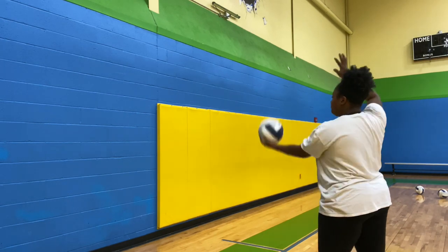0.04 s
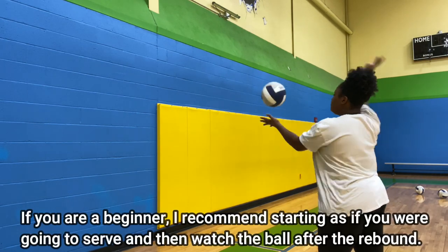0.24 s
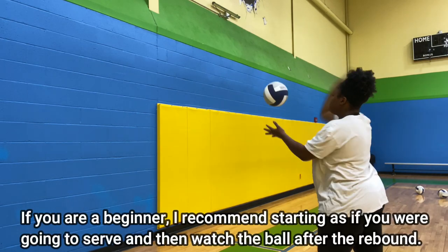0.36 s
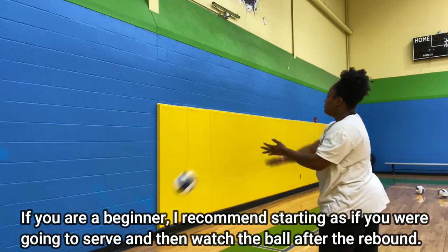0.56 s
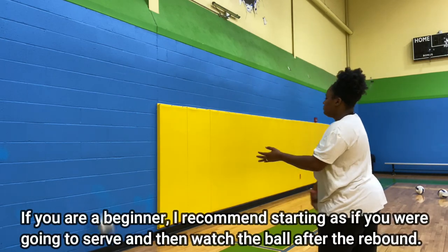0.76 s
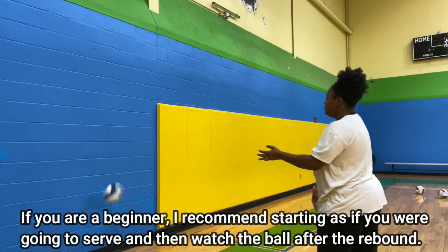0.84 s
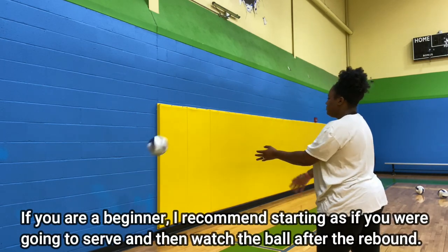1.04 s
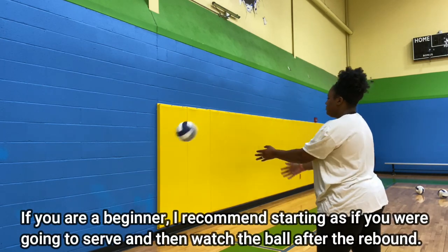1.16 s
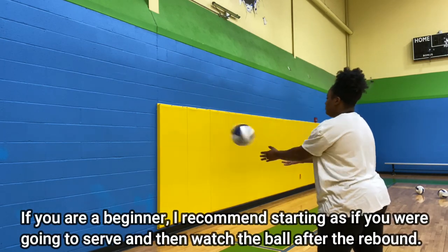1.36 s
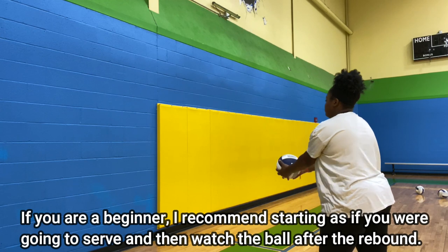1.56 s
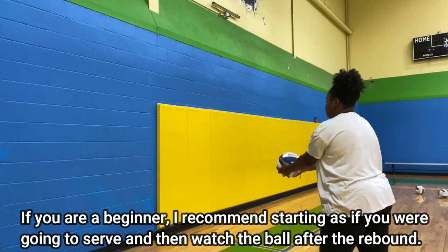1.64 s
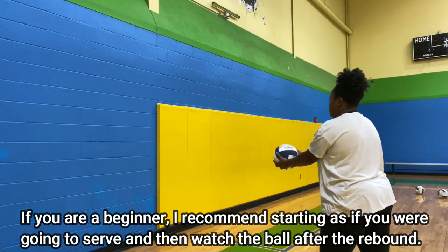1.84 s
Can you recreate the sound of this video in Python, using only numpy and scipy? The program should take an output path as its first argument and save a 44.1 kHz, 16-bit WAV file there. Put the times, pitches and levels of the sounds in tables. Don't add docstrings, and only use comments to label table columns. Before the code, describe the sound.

A volleyball is slapped by a hand, smacks a padded gym wall, then is softly caught

```python
import sys
import numpy as np
from scipy import signal
from scipy.fft import rfft, irfft
from scipy.io import wavfile
from scipy.ndimage import uniform_filter1d

SR = 44100
rng = np.random.default_rng(int(sys.argv[2]) if len(sys.argv) > 2 else 0)


def attenuation_scalar(level_db):
    decades = np.asarray(level_db, float) / 20
    return 10 ** decades


def persist_wave(psi):
    counts = np.round(np.clip(psi, -1, 1) * 32767).astype(np.int16)
    wavfile.write(sys.argv[1], SR, np.atleast_2d(counts).T)


N = 83790

# (frequency [Hz], level [dB per Hz])
SLAP_COLOUR = [(200, 3.5), (500, -5.5), (1230, -10.5), (1980, -14), (3200, -14.5), (5230, -27.5),
               (8000, -25), (16000, -33)]
WALL_COLOUR = [(200, 7.5), (700, 1.5), (1050, 2), (2170, 1), (3130, -7), (5330, -21.5), (8200, -17.5),
               (16000, -24)]
CATCH_COLOUR = [(200, -3.5), (450, -2.5), (1500, -3), (2400, -5), (3500, -10), (5500, -19), (8500, -18.5),
                (16000, -26.5)]
# (time [s], crack tail level [dB], thump tail level [dB])
TAILS = [
    (0.457, -21.5, -18),
    (0.724, -20.5, -15),
    (1.533, -38, -103),
]
TAIL_RISE_S = 0.011


def rms_one(x):
    return x / np.sqrt(np.mean(x ** 2) + 1e-20)


def at_hz(points, hz):
    points = np.array(points)
    return np.interp(np.log(hz), np.log(points[:, 0]), points[:, 1])


def since(s):
    return np.maximum(np.arange(N) / SR - s, 0)


def loudness(spectrum):
    hz = np.linspace(100, SR / 2, num=400)
    return np.sqrt(np.mean(attenuation_scalar(2 * at_hz(spectrum, hz))))


def peak(x, hz, db, sharp):
    g, w = attenuation_scalar(db / 2), 2 * np.pi * hz / SR
    a = np.sin(w) / (2 * max(sharp, .3))
    return signal.lfilter([1 + a * g, -2 * np.cos(w), 1 - a * g], [1 + a / g, -2 * np.cos(w), 1 - a / g], x)


def causal(db, size):
    ceps = irfft(np.log(attenuation_scalar(db)), size)
    ceps[1:size // 2] *= 2
    ceps[size // 2 + 1:] = 0
    return np.exp(rfft(ceps))


def widen(mid, side, alike):
    return np.sqrt(1 + alike) * mid + np.sqrt(1 - alike) * side * [[1], [-1]]


def hums():
    # (frequency [Hz], level [dB rms])
    tones = [
        (748, -58),
        (985, -60),
        (2040, -63),
        (5399, -69),
        (9060, -85),
    ]
    out, t = 0, np.arange(N) / SR
    for hz, db in tones:
        waver = .03 * np.cumsum(rng.standard_normal(N))
        phase = rng.uniform(0, 2 * np.pi, (2, 1)) + waver
        out = out + 2 * attenuation_scalar(db) * np.sin(2 * np.pi * hz * t + phase)
    return out


def ventilation_power(hz):
    # (frequency [Hz], level [dB per Hz])
    air_colour = [(30, -2), (60, 3.5), (134, -15), (450, -24), (1500, -34.5), (4200, -41.5), (5500, -69),
                  (9500, -62.5)]
    whole = np.sqrt(np.mean(attenuation_scalar(2 * at_hz(air_colour, np.arange(25, SR / 2, 5)))))
    return (attenuation_scalar(-25) / whole * attenuation_scalar(at_hz(air_colour, hz))) ** 2


def tail_power(hz, clumps):
    # (frequency [Hz], level [dB])
    tail_colour = [(200, -0.5), (500, -3), (1000, 2), (2200, 2.5), (4000, 5.5), (8000, 6), (10000, -30.5)]
    # (frequency [Hz], time to fall 60 dB [s])
    hall_t60 = [(100, 1.23), (300, 1.63), (1000, 2.02), (2200, 3.46), (4000, 2.77), (8000, 0.98)]
    boom_low_hz, boom_high_hz, boom_t60_s = 78, 125, 1.72
    boom_band = 30 / (1 + (boom_low_hz / hz) ** 6) / (1 + (hz / boom_high_hz) ** 6)
    power = 0
    for (s, crack_db, thump_db), colour in zip(TAILS, (SLAP_COLOUR, WALL_COLOUR, CATCH_COLOUR)):
        t = since(s)
        skin_db = crack_db + at_hz(colour, hz) + at_hz(tail_colour, hz) - 60 * t / at_hz(hall_t60, hz)
        skin = clumps * attenuation_scalar(skin_db) / loudness(colour) * (hz > 150)
        boom = boom_band * attenuation_scalar(thump_db - 60 * t / boom_t60_s)
        power = power + (skin ** 2 + boom ** 2) * (1 - np.exp(-t / TAIL_RISE_S))
    return power


def tail_and_air():
    # (frequency [Hz], correlation [-1 to 1])
    likeness = [(60, 0.98), (150, 0.86), (380, 0.37), (950, -0.23), (2380, -0.15), (5980, 0.18), (15000, 1)]
    edges = 25 * 2 ** np.arange(0, 9.5, 1 / 3)
    tail_top_hz, mic_low_hz = 10200, 45
    lead = SR // 4
    clump_db, clump_size = 1.1, int(6 * SR / 1000)
    bunching = uniform_filter1d(uniform_filter1d(rng.standard_normal(N), clump_size), clump_size)
    clumps = attenuation_scalar(clump_db * rms_one(bunching))

    whites = rng.standard_normal((2, 2, N + lead)) + 1e-18
    noise = 0
    for k, (low, high) in enumerate(zip(edges, edges[1:])):
        band = signal.butter(2, [low, high], "band", fs=SR, output="sos")
        mid, side = signal.sosfilt(band, whites[k % 2])
        hz = np.sqrt(low * high)
        gain = np.sqrt(ventilation_power(hz) + tail_power(hz, clumps))
        alike = np.clip(at_hz(likeness, hz), -.95, .995)
        noise = noise + np.pad(gain, (lead, 0), "edge") * widen(mid, side, alike)
    noise = signal.sosfilt(signal.cheby2(8, 50, 1.1 * tail_top_hz, fs=SR, output="sos"), noise)
    noise = signal.sosfilt(signal.butter(4, mic_low_hz, "high", fs=SR, output="sos"), noise)
    return noise[:, lead:] / np.sqrt(2)


def sheen():
    band_hz, blow_levels_db, t60_s = (11000, 14700), [-42, -43.5, -55], 0.72
    band = signal.cheby1(4, 1, band_hz, "band", fs=SR, output="sos")
    noise = signal.sosfilt(band, rng.standard_normal((2, N)))
    power = 0
    for (s, _, _), db in zip(TAILS, blow_levels_db):
        t = since(s)
        power = power + attenuation_scalar(2 * db - 120 * t / t60_s) * (t > 0) * (1 - np.exp(-t / TAIL_RISE_S))
    return np.sqrt(power) * rms_one(noise)


def echoes(crack, thump):
    # (delay [s], crack level [dB], thump level [dB], left over right [dB])
    returns = [
        (0.0106, -7.5, -12.5, -4),
        (.028, -32.5, -18, 37),
        (0.0416, -13.5, -33, -3),
        (0.068, -42, -21, 16),
        (0.089, -25.5, -12.5, 18),
    ]
    crack_cut_hz, thump_cut_hz, smear_ms = 11000, 140, 2.9
    out = np.zeros((2, N))
    dull = signal.lfilter(*signal.butter(1, crack_cut_hz, fs=SR), crack)
    boom = signal.lfilter(*signal.butter(2, thump_cut_hz, fs=SR), thump)
    for s, crack_db, thump_db, pan_db in returns:
        d = int(s * SR)
        scatter = rng.standard_normal((2, 1024)) * np.exp(-np.arange(1024) / (smear_ms * SR / 1000))
        scatter = scatter / np.linalg.norm(scatter, axis=1, keepdims=True)
        back = signal.fftconvolve(dull, scatter, axes=1)[:, :N]
        back = attenuation_scalar(crack_db) * back * attenuation_scalar([[pan_db / 2], [-pan_db / 2]])
        out[:, d:] += (back + attenuation_scalar(thump_db) * boom)[:, :N - d]
    return out


def thumps():
    # (time [s], peak level [dB], first pitch [Hz], last pitch [Hz], length [ms])
    booms = [
        (0.4588, 0.5, 125, 105.7, 15),
        (.7258, 7.5, 226, 88, 24),
        (.8030, -11, 105, 95, 17.5),
        (0.823, -6, 104.6, 99.5, 25),
        (1.5298, -18, 305, 174, 9),
        (1.5398, -14, 115.3, 61.5, 23.2),
        (1.63, -25, 70.5, 57.6, 30),
        (1.7120, -21, 64, 59, 34),
    ]
    pitch_fall = 0.238
    out = 0
    for s, db, first_hz, last_hz, length_ms in booms:
        u = 1000 * since(s) / length_ms
        hz = (last_hz + (first_hz - last_hz) * np.exp(-u / pitch_fall)) * (u > 0)
        swell = np.sin(np.pi * np.clip(u, 0, 1)) ** 0.41
        out = out - attenuation_scalar(db) * swell * np.sin(2 * np.pi * np.cumsum(hz) / SR)
    return out


def cracks():
    # (time [s], level [dB], decay [ms], ringing pitch [Hz], colour and level taken from blow [0 slap,
    # 1 wall, 2 catch]); the ticks at 0.79 s and 0.81 s are separate glancing ticks in the catch's colour
    contacts = [(.4495, -1, .5, 8000, 0), (.4502, 2, .6, 1900, 0), (.4523, -3, .7, 7500, 0),
                (.4537, 2, .8, 2000, 0), (.4548, -5, .7, 850, 0), (.4560, -8, .9, 3000, 0),
                (.4590, -9, .8, 450, 0), (.7175, -16, 1.8, 2200, 1), (.7200, -10, .4, 8000, 1),
                (.7203, -3, .6, 3000, 1), (.7219, -13, .5, 7500, 1), (.7222, -4, .7, 2200, 1),
                (.7232, -5, .7, 700, 1), (.7244, -4, .7, 2200, 1), (.7905, -27, 1.2, 7500, 2),
                (.8125, -16, 3.0, 12500, 2), (1.5235, -23, 2.5, 8800, 2), (1.5255, -19, 1.5, 2500, 2),
                (1.5278, -14, 1.2, 1600, 2), (1.5305, -10, 1.0, 360, 2), (1.5383, -14, 1.5, 330, 2)]
    blow_levels = [
        5.5,
        8.5,
        3.95,
    ]
    # (frequency [Hz], correlation [-1 to 1])
    likeness = [(200, 0.99), (1000, 0.14), (3000, -0.09), (8000, 0.78), (14000, -0.84)]
    rise_ms, ring_db, ring_sharpness = .15, 6, 3.0
    span, before_s = 2048, .008
    out = np.zeros((2, N))
    t = np.arange(span) / SR - before_s
    hz = np.maximum(np.arange(span // 2 + 1) * SR / span, 10)
    alike = np.clip(at_hz(likeness, hz), -.95, .98)
    for s, db, decay_ms, ring_hz, blow in contacts:
        colour = at_hz((SLAP_COLOUR, WALL_COLOUR, CATCH_COLOUR)[blow], hz)
        colour = colour + 40 * np.log10(np.minimum(hz / 150, 1))
        shape = np.where(t < 0, np.exp(1000 * t / rise_ms), np.exp(-1000 * t / decay_ms))
        mid, side = rfft(shape * rng.standard_normal((2, span))) * causal(colour, span)
        burst = irfft(widen(mid, side, alike), span)
        burst = peak(burst, ring_hz, ring_db, ring_sharpness)
        burst = peak(burst, ring_hz, ring_db, 1.5)
        i = int((s - before_s) * SR)
        out[:, i:i + span] += attenuation_scalar(db + blow_levels[blow]) * burst / np.abs(burst).max()
    return out


def scene():
    left_db = 0.47
    crack, thump = cracks(), thumps()
    hall = echoes(crack, thump) + tail_and_air() + sheen() + hums()
    return (crack + thump + hall) * attenuation_scalar([[left_db / 2], [-left_db / 2]])


def microphone(x):
    # (frequency [Hz], level [dB], sharpness [Q])
    resonances = [
        (1658, -6.5, 3.9),
        (2040, 5, 1.29),
        (8900, 4, 1.3),
    ]
    for hz, db, sharp in resonances:
        x = peak(x, hz, db, sharp)
    return x


def gain_control(x):
    # (time [s], level [dB])
    ducks = [
        (0.45, -8),
        (0.723, -19),
        (1.533, 1.5),
    ]
    attack_s, release_s = 0.012, 0.078
    dip_db = 0
    for s, db in ducks:
        dip_db = dip_db + db * (1 - np.exp(-since(s) / attack_s)) * np.exp(-since(s) / release_s)
    return attenuation_scalar(dip_db) * x


def drop_bands(x):
    # (low edge [Hz], high edge [Hz])
    empty_bands = [
        (9900, 11000),
        (12500, 13300),
    ]
    mid, side = (x[0] + x[1]) / 2, (x[0] - x[1]) / 2
    mid = signal.sosfilt(signal.cheby2(4, 25, empty_bands[0], "bandstop", fs=SR, output="sos"), mid)
    side = signal.sosfilt(signal.cheby2(4, 25, empty_bands[1], "bandstop", fs=SR, output="sos"), side)
    return np.array([mid + side, mid - side])


def top_cut(x):
    return signal.sosfilt(signal.butter(12, 16420, fs=SR, output="sos"), x)


def record(dry):
    x = drop_bands(gain_control(microphone(dry)))
    top = 0.78
    x = x / (1 + (x / top) ** 4) ** (1 / 4)
    return top_cut(x)


dry = scene()
out = record(dry)
persist_wave(out)
```